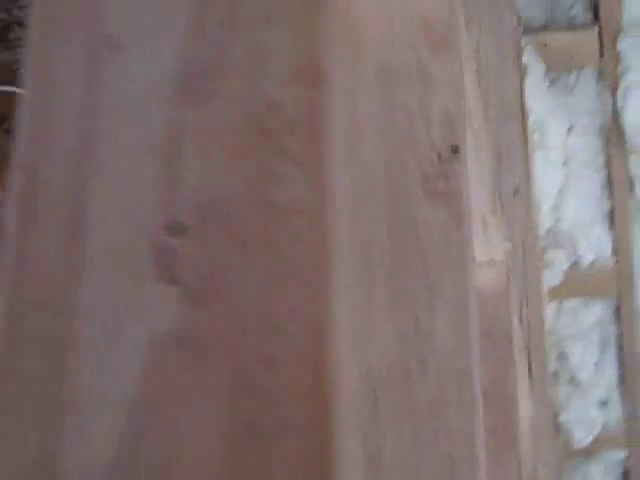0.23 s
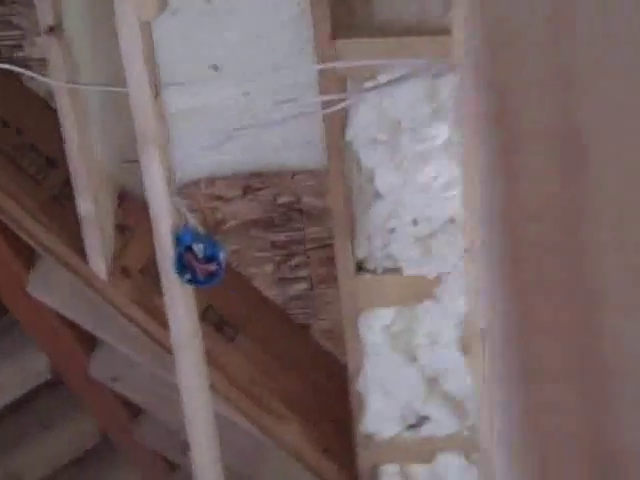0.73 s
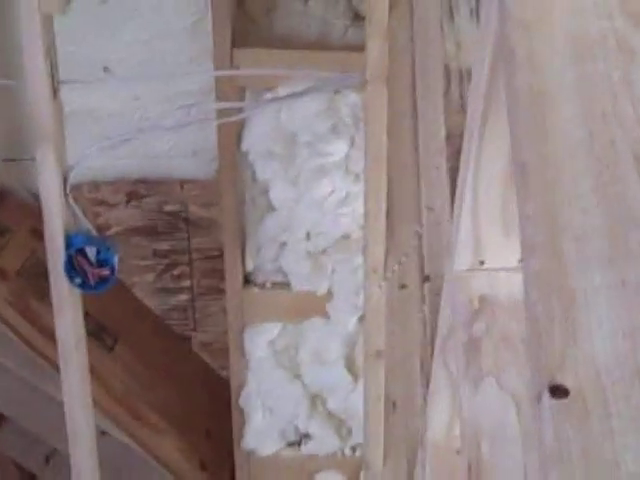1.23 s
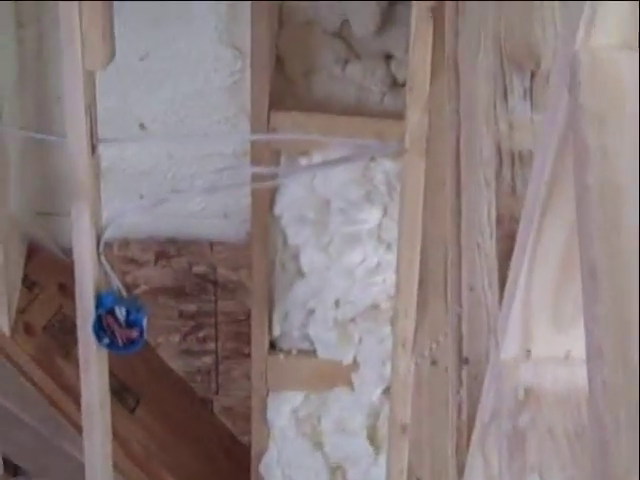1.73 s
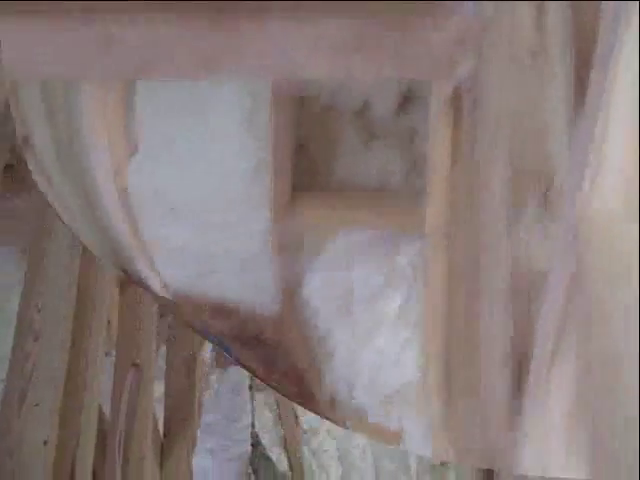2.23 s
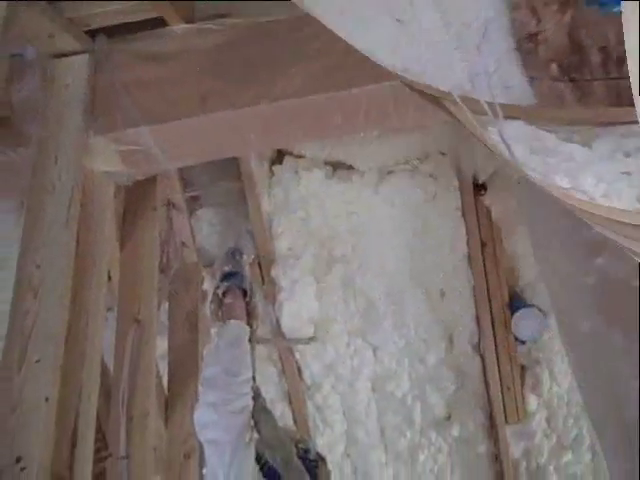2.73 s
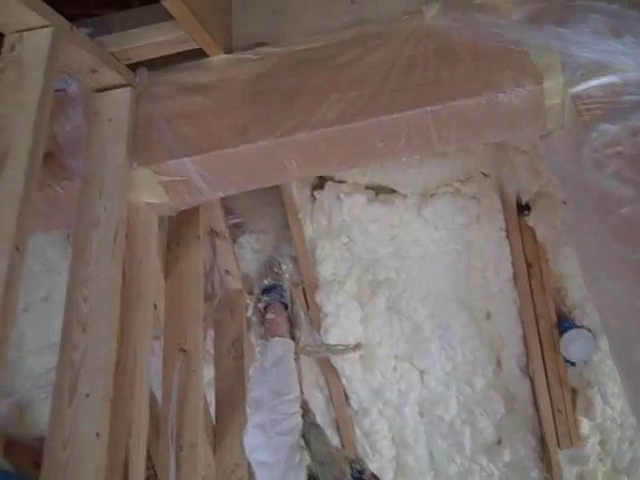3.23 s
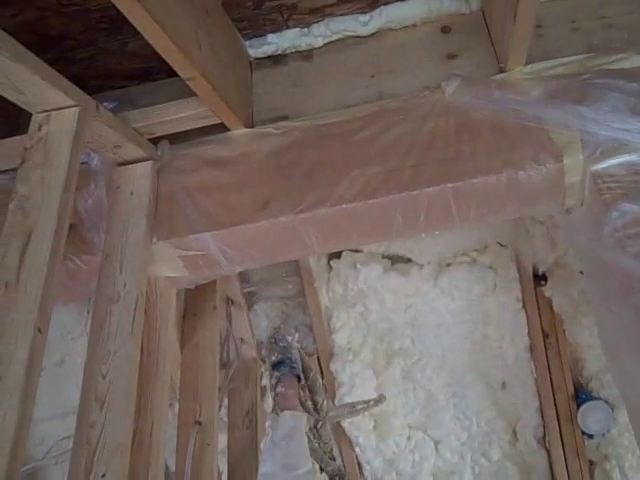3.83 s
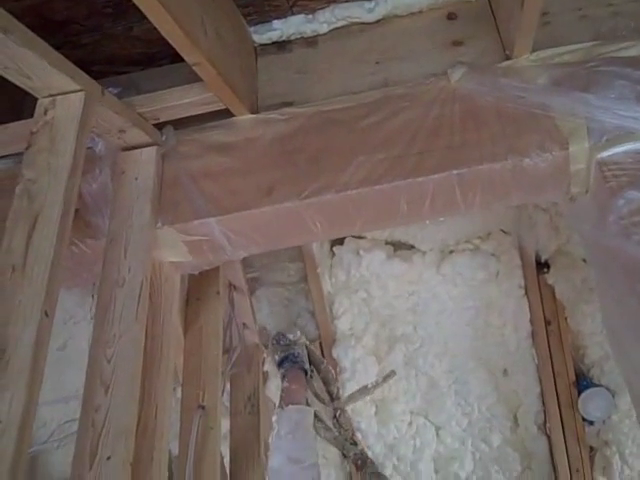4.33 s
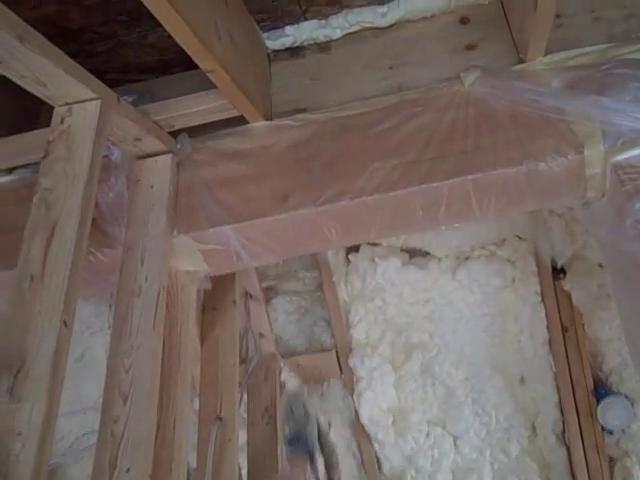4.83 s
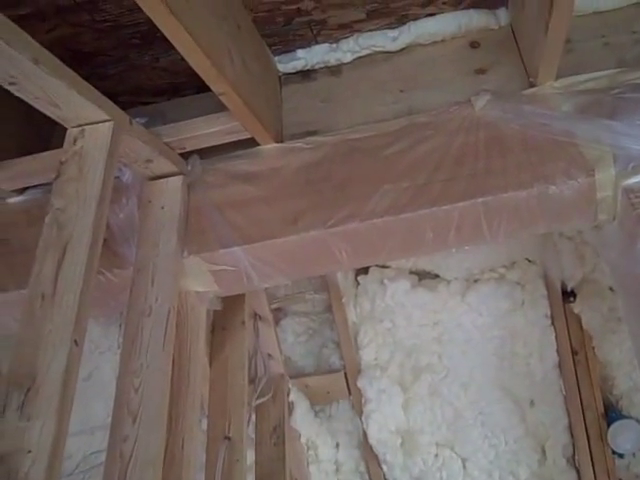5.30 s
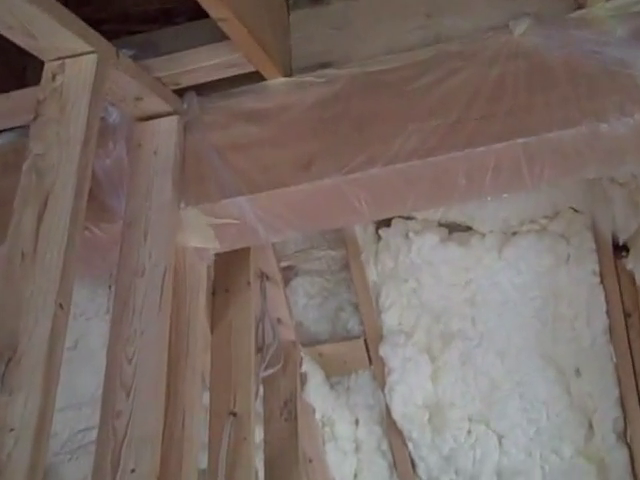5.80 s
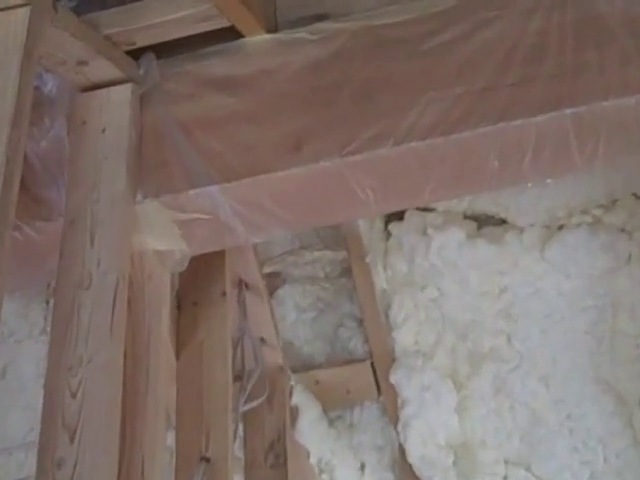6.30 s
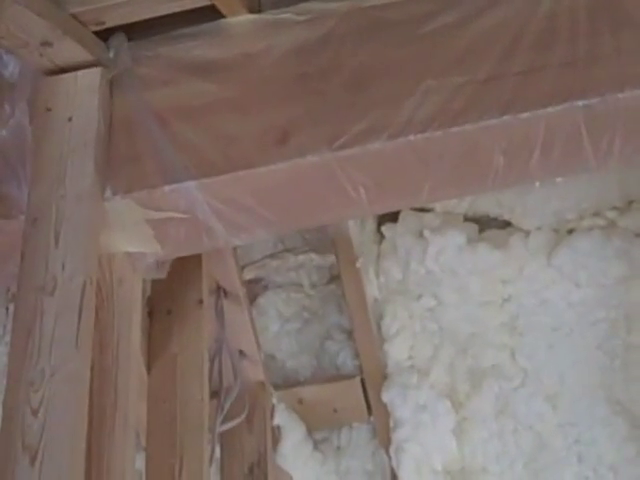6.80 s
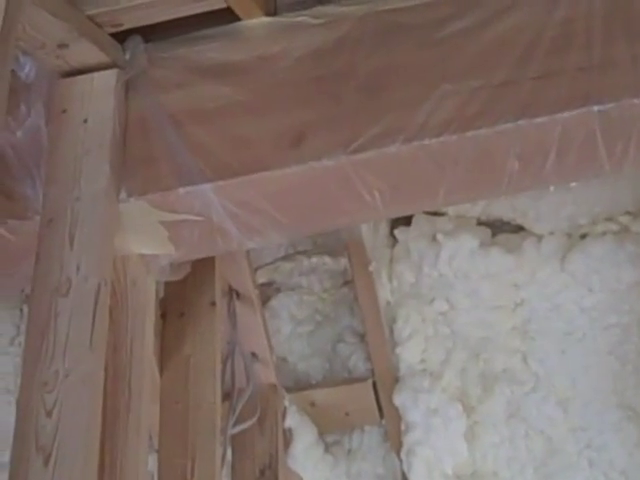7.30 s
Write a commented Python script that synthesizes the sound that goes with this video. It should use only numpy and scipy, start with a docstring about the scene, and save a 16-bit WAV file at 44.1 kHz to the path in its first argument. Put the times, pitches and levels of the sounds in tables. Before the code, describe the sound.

Booming hammer blows on wood over airy hissing, a stronger spray with faint whine, a sharp trigger-release puff, then softer steady hiss.

```python
"""Close by, a spray-foam gun hisses purge air among bare timber studs while hammer knocks boom with slap echoes.
A head-worn microphone turns towards the gun and away; a far machine hums and rumbles under it.
Air is shaped noise in moving bands, the frame is a set of decaying modes, walls are filtered echoes and a noise tail.
Narrow resonances slide through the hiss, the nozzle whines, a board groans, and the trigger lets go with a burst of air."""
import sys
import numpy as np
from scipy import signal
from scipy.fft import rfft, irfft, next_fast_len
from scipy.io import wavfile
from scipy.ndimage import uniform_filter1d

SR = 44100
rng = np.random.default_rng(int(sys.argv[2]) if len(sys.argv) > 2 else 0)


def transcribe(u):
    """Save the signal u as a 16-bit wav file named by the first command-line argument.

    u: samples, shape (n,) or (channels, n), limited to [-1, 1]; the rate is SR.
    q: integer samples, one column per channel.
    """
    v = np.clip(np.atleast_2d(u).T, -1, 1)
    q = np.round(v * 32767).astype(np.int16)
    wavfile.write(sys.argv[1], SR, q)


N = 332955
TIME = np.arange(N) / SR
SIZE = next_fast_len(N + SR)
HZ = np.maximum(np.fft.rfftfreq(SIZE, 1 / SR), 1)

# hiss by band, before the register trims: time_s, roar_db, edge_db, jet_db, air_db (low to high)
HISS_LEVELS = [(0.0, -50, -53.5, -44.5, -45), (0.22, -56.5, -51, -51.5, -47.5),
               (0.61, -49.5, -51, -48.5, -44.5), (0.73, -50, -54.5, -48.5, -45),
               (0.86, -57.5, -56.5, -49, -48), (1.02, -64.5, -56.5, -55.5, -55),
               (1.31, -62, -52.5, -53, -52.5), (1.7, -55, -48, -46, -45), (1.95, -59, -48.5, -47.5, -48.5),
               (2.13, -59, -53, -46.5, -47.5), (2.3, -56.5, -54.5, -56.5, -52),
               (2.6, -56.5, -57, -52.5, -52.5), (2.83, -54, -49, -50, -46), (3.03, -50, -45.5, -47, -43),
               (3.2, -50.5, -46.5, -44.5, -42.5), (3.91, -51, -46, -54, -40),
               (4.58, -48.5, -45, -53, -42.5), (4.72, -50, -48, -49, -42), (4.79, -53, -58, -56, -49),
               (4.87, -50.5, -63, -49.5, -59), (4.97, -50.5, -60.5, -49, -52),
               (5.2, -52.5, -55.5, -48, -46.5), (5.31, -53, -53, -46.5, -45),
               (5.39, -52.5, -50.5, -42, -47), (5.53, -51.5, -50, -45, -45),
               (6.27, -56.5, -49, -47.5, -49.5), (6.56, -59.5, -51, -45.5, -51),
               (6.98, -56.5, -51, -47, -46.5), (7.3, -56.5, -48.5, -46, -47), (7.55, -59, -49, -46, -49)]


def undb(db):
    """dB to gain."""
    return 10 ** (np.asarray(db) / 20)


def columns(table):
    """Each column of a curve after its time column, sample by sample."""
    s, *rest = np.transpose(table)
    return [np.interp(TIME, s, c) for c in rest]


def shaped(x, gain):
    """Weight the spectrum of x and bring it to rms 1."""
    y = irfft(rfft(x, SIZE) * gain, SIZE)[:N]
    return y / np.sqrt(np.mean(y ** 2))


def colour(table):
    """Gain for every frequency from (Hz, dB) points."""
    hz, db = np.transpose(table)
    return undb(np.interp(np.log(HZ), np.log(hz), db))


def below(hz, order=6):
    """Share of power that lies under a soft edge."""
    return 1 / (1 + (HZ / hz) ** order)


def walk(rate):
    """Random levels held 1 / rate s and slewed twice."""
    k = int(SR / rate)
    held = np.repeat(rng.standard_normal(N // k + 1), k)
    return uniform_filter1d(uniform_filter1d(held, k), k)[:N]


def hiss():
    """Turbulent air in five registers, roughened by droplets and combed by nearby studs."""
    # trims over the curves: roar_db, body_db, edge_db, jet_db, air_db
    register_trims = [0.43, 2.12, 0.11, 0.1, 1.15]
    # soft edges between the five registers: edge_hz
    register_edges = [1500, 4000, 6300, 10000]
    # spectrum of the escaping air: frequency_hz, density_db (per Hz)
    air_colour = [(180, -63), (300, -18), (468, -9.5), (706, -4.5), (779, -6), (1010, -6), (1100, -5),
                  (1280, -7.5), (3370, -7), (4170, -6.5), (5520, -4.5), (9340, -3.5), (11800, -6),
                  (14600, -3), (15300, -5.5)]
    # faint whistles of the stud bay: pitch_hz, width_hz, over_roar_db
    bay_whistles = [(661, 6, -21), (721, 7, -17)]
    # further level of those whistles: time_s, change_db
    bay_levels = [(0, -28), (2.6, -4), (3.1, 0.5), (4.7, 2.5), (5.0, -5), (5.6, -11), (7.55, -13)]
    # studs close to the ear throw the hiss back: start_s, end_s, lag_ms, share (signed ratio)
    stud_echoes = [(.3, .62, 2.04, -.1), (.6, .92, 3.33, .14), (1.5, 2.05, 2.61, .08),
                   (3.5, 4.0, 1.01, -.08), (5.3, 6.0, 1.97, .11), (5.6, 6.1, 1.11, -.13),
                   (5.7, 7.55, 2.51, .08), (5.9, 7.55, 3.15, .1), (6.4, 7.55, 1.01, -.1),
                   (6.8, 7.55, 1.57, -.09)]
    spit_db, flicker_db, swell_db = 1, 1.0, .5

    roar, edge, jet, air = columns(HISS_LEVELS)
    body = (roar + edge) / 2
    levels = np.array([roar, body, edge, jet, air]) + np.array(register_trims)[:, None]
    shares = np.diff([0 * HZ] + [below(hz) for hz in register_edges] + [0 * HZ + 1], axis=0)
    out, common = 0, walk(9)
    for db, share in zip(levels, shares):
        # a new random level every 64 samples
        spit = rng.standard_normal(N // 64 + 1).repeat(64)[:N]
        droplets = rng.standard_normal(N) * undb(spit_db * spit)
        band = shaped(droplets, colour(air_colour) * np.sqrt(np.maximum(share, 0)))
        out = out + band * undb(db + swell_db * common + flicker_db * walk(15))

    for hz, width, db in bay_whistles:
        resonance = 1 / np.hypot(HZ - hz, width / 2) ** 2
        whistle = shaped(rng.standard_normal(N), resonance)
        out = out + undb(levels[0] + db + columns(bay_levels)[0]) * whistle

    heard = out.copy()
    for start, end, lag_ms, share in stud_echoes:
        near = np.interp(TIME, [start - .05, start + .05, end - .05, end + .05], [0, 1, 1, 0])
        heard += share * near * np.roll(out, int(round(lag_ms * SR / 1000)))
    return scattered(heard)


def scattered(x):
    """Many short reflections off the framing ripple the spectrum; each pose of the swaying head has its own."""
    pose_s, scatter_db, scatter_s = .18, -8, .009
    out, t = np.zeros(N), TIME[:2048]
    poses = np.arange(0, N / SR + pose_s, pose_s)
    for k in range(len(poses)):
        answer = rng.standard_normal(len(t)) * np.exp(-t / scatter_s) * (t > .0012)
        answer *= undb(scatter_db) / np.sqrt(np.sum(answer ** 2))
        first, last = (int(np.clip(j * pose_s * SR, 0, N)) for j in (k - 1, k + 1))
        # square-root fades keep the reflected power steady between unrelated patterns
        fade = np.sqrt(np.interp(TIME[first:last], poses, np.arange(len(poses)) == k))
        out[first:last] += fade * signal.fftconvolve(x[first:last], answer)[:last - first]
    # long waves bend round the studs and scatter little
    out = signal.sosfilt(signal.butter(2, 900, "high", fs=SR, output="sos"), out)
    return (x + out) / np.sqrt(1 + undb(2 * scatter_db))


def machine():
    """A far machine: a wavering hum over a dull rumble that swells a little with the roar of the gun."""
    # hum before its waver: time_s, level_db
    hum_levels = [(0.0, -69), (0.57, -75), (0.69, -72), (1.47, -72), (1.68, -67), (2.12, -69.5),
                  (2.29, -64), (5.4, -66), (5.61, -72), (6.39, -71.5), (7.55, -65.5)]
    # spectrum of the rumble: frequency_hz, density_db (per Hz)
    rumble_colour = [(15, -49), (25, 3), (49, 0.5), (102, -6.5), (141, -8), (188, -2.5), (233, 0),
                     (295, -8), (500, -2), (650, -21), (1100, -120)]
    hum_hz, hum_waver_db = 149.5, 1.4
    rumble_db, rumble_follows = -61, 0.21  # level when the roar curve is at -52 dB; dB per dB of roar

    pitch = hum_hz * (1 + 0.0019 * walk(3.8))
    hum = np.sqrt(2) * np.sin(2 * np.pi * np.cumsum(pitch) / SR)
    rumble = shaped(rng.standard_normal(N), colour(rumble_colour))
    followed_db = rumble_db + rumble_follows * (columns(HISS_LEVELS)[0] + 52)
    hum_db = columns(hum_levels)[0] + hum_waver_db * walk(6.5)
    return hum * undb(hum_db) + rumble * undb(followed_db)


def push(ms):
    """Smooth raised-cosine force of a contact, area 1."""
    force = np.hanning(max(int(ms * SR / 1000), 1) + 2)
    return force / force.sum()


def room():
    """A noise tail whose deepest bass lasts longest; near walls answer first and strongest."""
    # tail by band: frequency_hz, t60_s, level_db (before the bandwidth and early weights)
    tail_bands = [(120, 0.79, -24), (235, 0.47, -29), (366, 0.67, -20.5), (504, 0.53, -19),
                  (970, 0.33, -16), (1600, 0.34, -18.5), (3480, 0.33, -25)]
    early, early_s = 0.9, 0.0065
    t = TIME[:SR]
    tail = 0
    for hz, t60, db in tail_bands:
        band = shaped(rng.standard_normal(N), np.exp(-np.log2(HZ / hz) ** 2 * 2))[:SR]
        # dense echoes decay evenly
        band = band / np.sqrt(uniform_filter1d(band ** 2, size=int(3 * SR / hz)))
        tail = tail + undb(db - 60 * t / t60) * band * np.sqrt(hz / SR)
    return tail * np.minimum(t / .004, 1) * (1 + early * np.exp(-t / early_s))


def knocks():
    """Hammer blows ring the frame, slap off walls and fill the room; longer contacts are duller."""
    # blows: start_s, level_db, place (0 joist, 1 stud), contact_ms, room_db (relative)
    blows = [(0.02, -13, 0.048, 0.58, -10), (.326, -12.5, 0.035, 0.72, -8), (0.703, -41.5, 0.89, 0.44, 0.5),
             (1.007, -24.5, 1, 2.65, -6.5), (1.824, -33.5, 0.84, 0.8, -5), (2.1041, -17.5, 0.94, 0.51, -10),
             (2.372, -13.5, 0.94, 0.39, -10)]
    # timber modes before a slight random detune: pitch_hz, joist_db, stud_db, t60_s
    frame_modes = [(72, -17, -17, 0.23), (119, -11, -12.5, 0.18), (175, -20, -16, 0.12),
                   (226.7, 10, -4, 0.056), (278, -7, 3, 0.039), (334, 0, -1, 0.056),
                   (410.7, -6.5, -2.5, 0.12), (519, -6, -9, 0.037), (576, -0.5, 1, 0.033),
                   (654, -1.5, 3, 0.035), (762, -5, -0.5, 0.035), (836, -0.5, 2, 0.044),
                   (950, 3.5, -1, 0.022), (1066, -7, -4, 0.031), (1240, -3, -9, 0.042),
                   (1500, -54, -5, 0.031), (1790, -4, -12, 0.04), (2380, 14.5, 7, 0.0078)]
    # walls send each blow back in lumps: lag_s, joist_db, stud_db, favoured_hz, width_hz
    wall_slaps = [(.004, -7, 5.5, 830, 250), (.008, -1, -16, 225, 110), (.011, -2, -4, 720, 250),
                  (.023, -7, -15, 900, 200), (.027, 1, -10, 372, 120), (.052, -12, -13, 950, 160),
                  (.066, -5, -23, 720, 250), (.094, -7, -16, 900, 200), (.017, -16, -4, 640, 120),
                  (0.034, -3, -15, 225, 80), (.040, -1, -12, 635, 120), (.050, -3, 5, 420, 80),
                  (0.055, -5.5, -4, 270, 80), (.064, -12, -20, 227, 70), (.079, -17, -23, 225, 70),
                  (0.089, -29, -9, 222, 70), (.097, -24, -3, 295, 80), (.110, -29, -11, 225, 60),
                  (.130, -20, -10, 235, 80), (0.171, -23, -15, 235, 80)]
    crack_db, crack_s, crack_hz = -17.5, 0.0084, 3830
    build_s = 0.002  # the frame takes a moment to ring fully
    slam_s, slap_s = 0.0059, 0.015  # decay of the part of a blow that drives the room; that slaps back

    out, t = np.zeros(N + 2 * SR), TIME[:SR // 2]
    hz, joist_db, stud_db, t60 = np.transpose(frame_modes)[:, :, None]
    splinters = shaped(rng.standard_normal(N), np.sqrt(below(crack_hz, order=3)))
    rooms = [room(), room()]  # as heard from the joist and from the stud
    for s, db, place, ms, room_db in blows:
        at, toward_stud = int(s * SR), np.clip(place, 0, 1)
        mode_db = joist_db + toward_stud * (stud_db - joist_db)
        detune = 1 + 0.005 * rng.standard_normal(hz.shape)
        modes = undb(mode_db - 60 * t / t60) * np.sin(2 * np.pi * hz * detune * t)
        ring = np.sum(modes, axis=0) * (1 - 0.79 * np.exp(-t / build_s))
        crack = undb(crack_db) * splinters[at:at + len(t)] * np.exp(-t / crack_s) / (1 + ms ** 4)
        blow = np.convolve(ring / np.abs(ring).max(), push(ms))[:len(t)] + crack
        out[at:at + len(t)] += undb(db) * blow

        slam = blow * np.exp(-t / slam_s)
        drive = slam * np.std(blow) / np.std(slam)
        tail = undb(db + room_db) * signal.fftconvolve(drive, rooms[int(place > .5)])
        out[at:at + len(tail)] += tail

        for lag_s, from_joist, from_stud, echo_hz, width in wall_slaps:
            echo_db = from_joist + toward_stud * (from_stud - from_joist)
            late = at + int(lag_s * SR)
            b, a = signal.iirpeak(echo_hz, echo_hz / width, fs=SR)
            echo = signal.lfilter(b, a, blow * np.exp(-t / slap_s))
            out[late:late + len(t)] += undb(db + echo_db) * echo
    return out[:N]


def narrow(start, end, from_hz, to_hz, width, db, fade_s):
    """A narrow band of noise that fades in, slides in pitch and fades out."""
    swell = np.interp(TIME, [start, start + fade_s, end - fade_s, end + fade_s], [0, 1, .8, 0])
    # slow noise on two quadrature carriers gives a band centred on the pitch
    lowpass = signal.butter(2, width / 2, fs=SR, output="sos")
    cos, sin = signal.sosfilt(lowpass, rng.standard_normal((2, N)))
    turn = 2 * np.pi * np.cumsum(np.interp(TIME, [start, end], [from_hz, to_hz])) / SR
    return undb(db) * swell * (cos * np.cos(turn) + sin * np.sin(turn)) / np.std(cos)


def gliding_resonances():
    """Faint, narrow resonances in the hiss, as bands of noise that come, slide or hold, and go."""
    # resonances: start_s, end_s, from_hz, to_hz, width_hz, level_db
    resonance_bands = [(.28, .48, 8150, 8150, 201.5, -48.5), (1.102, 1.55, 4450, 4450, 151, -64),
                       (1.55, 2.05, 5750, 5770, 200, -59), (2.8, 3.347, 5500, 5080, 400, -57),
                       (2.85, 3.2, 8500, 8350, 250, -59), (3.3, 3.75, 9500, 9500, 250, -52),
                       (4.05, 4.3, 3400, 3400, 150, -52), (5.38, 6.199, 3000, 3320, 130, -55.5),
                       (5.35, 5.9, 5100, 5050, 160, -59), (5.398, 6.1, 5550, 5850, 180, -58),
                       (5.35, 5.9, 6150, 6200, 180, -57), (5.278, 5.686, 8100, 8250, 250, -54),
                       (5.548, 6.097, 9100, 9350, 220, -61), (5.703, 6.2, 7750, 7570, 200, -59),
                       (5.8, 6.203, 7050, 6940, 180, -61), (6.15, 6.805, 5300, 5250, 180, -59),
                       (6.152, 6.5, 8900, 8800, 200, -62), (6.4, 6.8, 7200, 7300, 201, -62),
                       (6.5, 7.9, 3530, 3490, 70, -60), (6.95, 7.5, 8600, 8600, 200, -58),
                       (6.998, 7.598, 6600, 6750, 200, -61)]
    return sum(narrow(*row, fade_s=.08) for row in resonance_bands)


def taps():
    """Something brushes the microphone: a one-sided push that swings back."""
    # touches: start_s, strength (signed amplitude factor), time_scale_ms
    touches = [(.649, -0.044, 0.61), (.680, 0.11, 0.77)]
    out = np.zeros(N)
    for s, strength, ms in touches:
        t = np.maximum(TIME - s, 0) * 1000 / ms
        out += strength * np.e * t * np.exp(-t * 2) * 2 * (1 - 0.74 * t)
    return out


def whine():
    """The nozzle whines while it sprays: two thin lines that drift together and waver apart."""
    # whine before the line ratios and waver: time_s, pitch_hz, level_db
    nozzle_whine = [(2.3, 1092, -80), (2.62, 1093, -63), (2.94, 1087, -60), (3.1, 1066, -62),
                    (3.29, 1060, -63), (3.45, 1084, -58), (3.6, 1085, -64), (3.72, 1089, -58.5),
                    (4.2, 1077, -59), (4.7, 1070, -58), (4.74, 1070, -85)]
    lower_ratio, upper_ratio = 0.99, 1.108  # each line over the pitch curve
    upper_db, waver_db = -4.5, 3.5
    hz, db = columns(nozzle_whine)

    def line(ratio):
        """One sine wavering in level and pitch."""
        level = np.sqrt(2) * undb(waver_db * walk(12))
        pitch = ratio * hz * (1 + 0.0029 * walk(25.07))
        return level * np.sin(2 * np.pi * np.cumsum(pitch) / SR)

    return undb(db) * (line(lower_ratio) + undb(upper_db) * line(upper_ratio))


def groan():
    """A board groans low for a moment, as a narrow band of noise."""
    # one groan: start_s, end_s, from_hz, to_hz, width_hz, level_db
    board_groan = (3.086, 3.245, 185, 185, 70, -52.5)
    return narrow(*board_groan, fade_s=.016)


def release():
    """The trigger lets go: the valve snaps with a thump and trapped air spits out in ragged puffs."""
    # puffs before their raggedness: peak_s, level_db
    air_puffs = [(4.7077, -18.5), (4.71, -23), (4.716, -17.5), (4.722, -23)]
    # spectrum of the burst: frequency_hz, density_db (per Hz)
    burst_colour = [(35, -40), (60, -13), (734, -1), (1060, -6), (1470, -3), (2510, -8.5), (2880, -5.5),
                    (4800, -12), (5270, -9), (5780, -10), (15300, -6.5)]
    rise_db_per_s, fall_db_per_s = 5000, 1700
    leak_db, leak_fall_db_per_s, leak_low_hz = -32, 380, 2500  # the last air seeping out
    valve_s, snap_gain = 4.7075, 0.29

    def swell(s, db, fall):
        """Power that rises to s and falls after it, straight in dB."""
        return undb(db + np.minimum(rise_db_per_s * (TIME - s), fall * (s - TIME))) ** 2

    power = sum(swell(s, db, fall_db_per_s) for s, db in air_puffs)
    ragged = undb(2.0 * walk(600))
    air = shaped(rng.standard_normal(N), colour(burst_colour)) * np.sqrt(power) * ragged
    seep = shaped(rng.standard_normal(N), np.sqrt(1 - below(leak_low_hz)))
    air = air + seep * np.sqrt(swell(air_puffs[-1][0], leak_db, leak_fall_db_per_s))
    t = np.maximum(TIME - valve_s, 0)
    thump = 0.073 * np.sin(2 * np.pi * 70 * t) * np.exp(-t / 0.0045)
    snap = snap_gain * np.sin(2 * np.pi * 620 * t) * np.exp(-t / 0.00049)
    return air + thump + snap


def scene():
    """Everything at one microphone."""
    air = hiss() + gliding_resonances() + whine()
    return (air + machine() + knocks() + groan() + taps() + release())[None]


def baseline():
    """The baseline leans against every change of a simple spray-flow curve, then settles."""
    offset, lean, settle_s = -0.00059, 0.013, 0.095  # resting level; jump for a full change of flow
    full_s, grows_s, ends_s = 3.04, 0.45, 4.724
    flow = np.exp(np.minimum(TIME - full_s, 0) / grows_s) * (TIME < ends_s)
    keep = np.exp(-1 / (settle_s * SR))
    return offset - lean * signal.lfilter([1, -1], [1, -keep], flow)


def record(dry):
    """The microphone drops the deepest bass, the baseline leans, and the top is cut."""
    mic_low_hz, top_hz = 73, 15430
    thin = signal.sosfilt(signal.butter(2, mic_low_hz, "high", fs=SR, output="sos"), dry)
    top_cut = signal.ellip(12, .3, 70, top_hz, fs=SR, output="sos")
    return signal.sosfilt(top_cut, thin + baseline())


dry = scene()
out = record(dry)
transcribe(out)
```